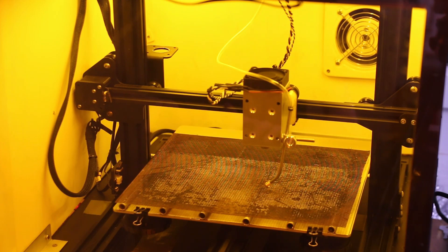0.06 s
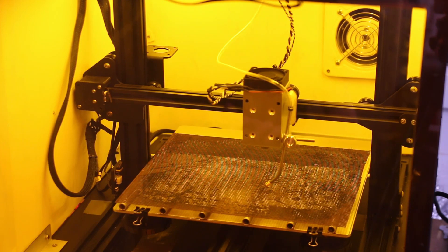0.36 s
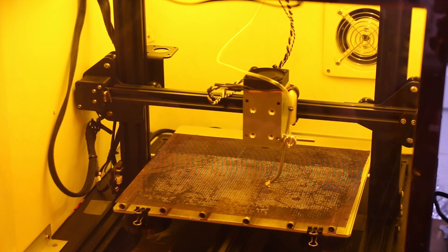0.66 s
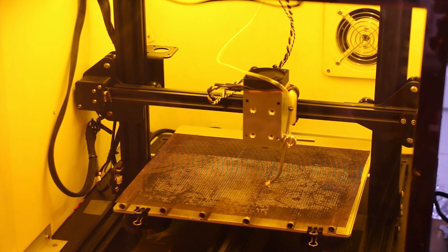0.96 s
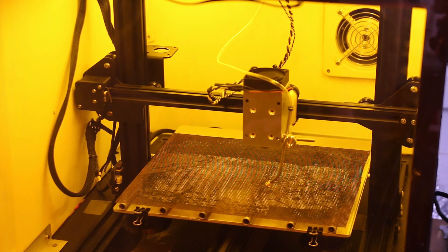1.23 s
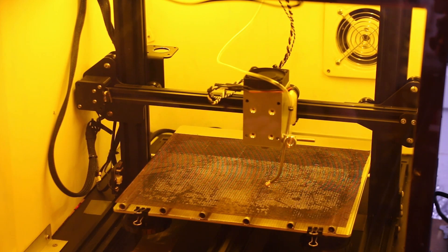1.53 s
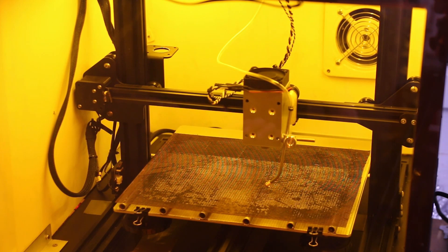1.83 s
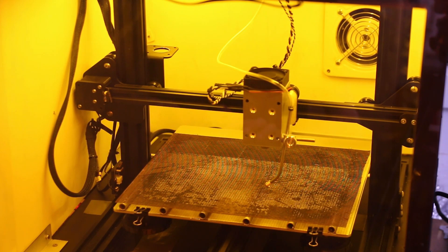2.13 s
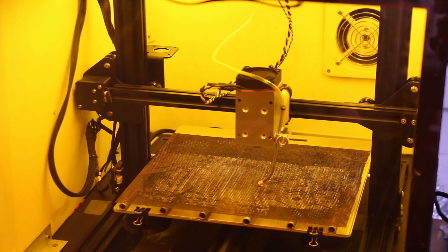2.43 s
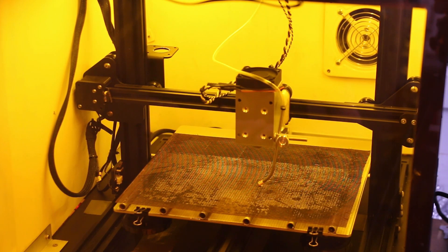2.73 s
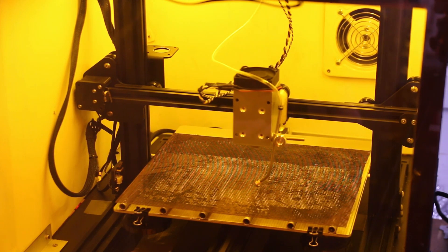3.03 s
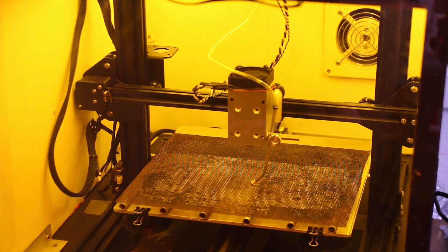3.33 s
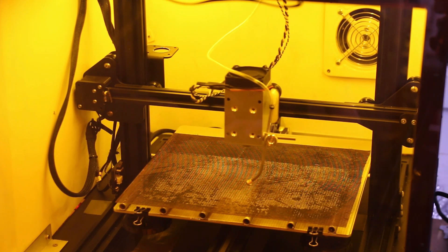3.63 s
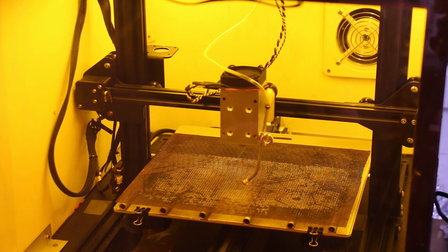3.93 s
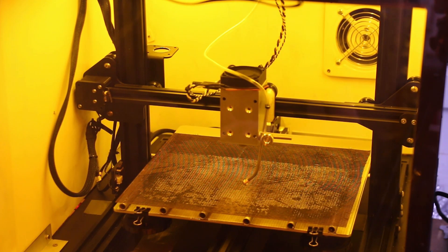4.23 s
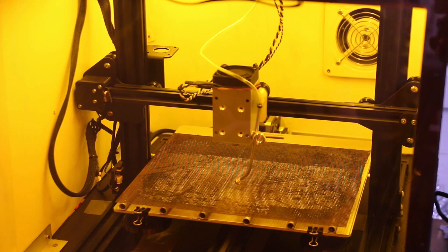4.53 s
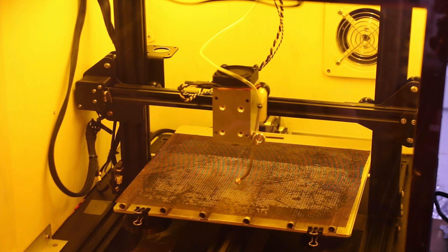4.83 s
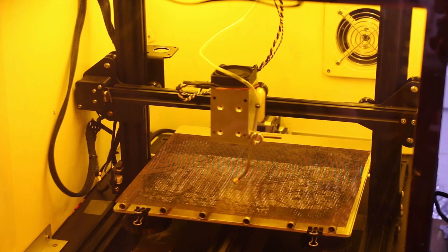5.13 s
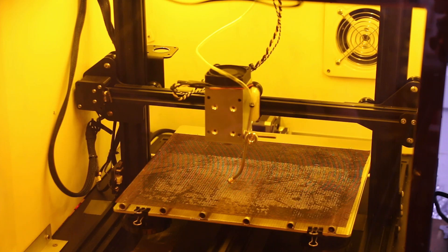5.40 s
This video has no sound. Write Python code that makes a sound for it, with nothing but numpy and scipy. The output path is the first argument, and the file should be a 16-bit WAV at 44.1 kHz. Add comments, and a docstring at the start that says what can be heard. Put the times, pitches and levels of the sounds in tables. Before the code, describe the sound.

A bright, steady hiss of compressed air from a small nozzle runs for the whole clip, about five and a half seconds. It strikes a machine bed inside a metal cabinet, so it has a slight ringing colour and short reflections. The hiss is fullest at first. At about 2.3 seconds it turns thinner and a little quieter, and it thins again around 3.1 seconds over a perforated surface. It then creeps up in level and becomes fuller at about 5.3 seconds. Underneath, quieter and constant, a small air pump chatters rapidly, a low electrical hum throbs, and fans rush faintly with a slight whine. Stepper motors add very soft, short, low blips at about 2.4, 3.2, 3.8, 4.6 and 5.3 seconds, barely rising out of the background. The listening position stays fixed.

```python
"""A jet of compressed air hisses from a small nozzle onto the bed of a gantry machine in a metal cabinet.
Its turbulence is broadband noise, coloured by resonances of the gap under the nozzle and by wall echoes.
The hiss is fuller on solid plate and thins as the head creeps across the perforated bed.
Behind it a small air pump chatters and stepper motors blip softly. Fans rush faintly,
and their mains hum beats with the hum of the pump."""
import sys
import numpy as np
from scipy import signal
from scipy.fft import rfft, irfft
from scipy.io import wavfile
from scipy.ndimage import uniform_filter1d

SR = 44100
rng = np.random.default_rng(int(sys.argv[2]) if len(sys.argv) > 2 else 0)


def wav_out(sig):
    """Save sig, one row per channel (or a flat mono array), as 16-bit PCM at SR to the path in sys.argv[1]."""
    wavfile.write(sys.argv[1], SR, np.round(np.clip(np.atleast_2d(sig).T, -1, 1) * 32767).astype(np.int16))


N = 249606
T = np.arange(N) / SR

# Spectra of the jet on the plate, its rim, the holes and their edge: f/Hz, relative density/dB
PLATE_SPECTRUM = [(1700, -13.5), (2400, -11.5), (3000, -8.5), (4200, -7), (4800, -4), (5350, -0.5),
                  (6300, -3), (7000, -1.5), (8600, -4), (9800, -6), (11100, -9), (12400, -5.5), (15700, -8)]
RIM_SPECTRUM = [(1700, -13), (2700, -9), (4300, -5), (5300, -1.5), (7000, -0.5), (8700, -1.5),
                (10000, -4.5), (11000, -6.5), (12400, -3.5), (15700, -4.5)]
HOLES_SPECTRUM = [(1700, -11.5), (2700, -10), (4400, -5), (5500, -1.5), (7000, -2), (9000, -2), (10000, -4),
                  (11000, -7.5), (12000, -2.5), (14600, -5), (15700, -3.5)]
EDGE_SPECTRUM = [(1700, -17), (3000, -8.5), (4300, -5.5), (5300, -4.5), (7000, -2.5), (9000, -6),
                 (11000, -8.5), (12400, -6.5), (15700, -8.5)]
# Modes of the gap under the nozzle on the same surfaces: f/Hz, bandwidth/Hz, relative gain/dB
PLATE_MODES = [(3036, 77, -9), (3330, 69, -4.5), (3535, 31, -14), (3680, 18, -1), (3837, 50, -2.5),
               (4014, 21, 0), (4250, 31, -5), (4500, 14, 2), (4640, 23, 0.5), (5070, 20, 3),
               (5250, 170, -0.5), (5740, 86, -1.5), (6060, 47, 1.5), (6450, 34, -2.5), (6920, 62, 1),
               (7730, 64, -7), (7780, 53, -9), (8200, 31, -2.5), (8600, 60, -1), (8840, 66, -5.5)]
RIM_MODES = [(5260, 78, -3), (6550, 32, -2), (6860, 82, -1), (8500, 53, -8), (8840, 110, -2.5),
             (10300, 100, -5.5), (10800, 48, -8), (12600, 74, -10), (13100, 120, -8), (14300, 110, -12)]
HOLES_MODES = [(5800, 46, 1), (6350, 52, -1), (6830, 150, -1), (7300, 47, 2), (8320, 41, 1),
               (11300, 42, -7), (12300, 64, -5), (13000, 160, -6), (14300, 68, -1), (14800, 200, -5)]
EDGE_MODES = [(3480, 30, 0), (4880, 27, 3), (5200, 38, 5), (5540, 34, 2), (5800, 78, 0), (6100, 29, -2),
              (6740, 210, -4.5), (7170, 92, -6), (8710, 29, 1), (9080, 56, -0.5)]
# Passages of the jet from plate to rim, rim to holes and holes to edge: midpoint t/s, duration/s
SURFACE_CROSSINGS = [(2.32, 0.068), (3.14, 0.13), (5.27, .06)]
# Valve impacts in one turn of the pump: t/s after the stroke, relative level/dB
VALVE_SLAPS = [(0, 0), (.006, -5), (.0225, -8)]
# Modes of the pump housing: f/Hz, bandwidth/Hz, relative gain/dB
HOUSING_MODES = [(689.4, 33, -10.5), (957.7, 18, -3.5), (975.4, 24.7, 1.5), (1073, 27, -4),
                 (1170, 6.7, -12.5), (1194, 58, -9.5), (1322, 66, -3.5), (1350, 63, -1.5), (1513, 53, 0),
                 (1615, 33, -3.5), (1641, 38, -5.5)]
# Spectrum of the flow through the pump outlet: f/Hz, relative density/dB
OUTLET_SPECTRUM = [(880, -23), (980, 2), (1100, -24), (1200, -5), (1270, -10.5), (1350, 6), (1450, -11.5),
                   (1520, 3), (1620, -6.5), (1740, -17.5)]
# Stepper blips heard through the frame: centre t/s, f/Hz, greatest rms level/dB, 1/e half-length/s
STEPPER_BLIPS = [(2.35, 470, -59, 0.067), (3.17, 453, -60, .035), (3.26, 175, -60.5, 0.038),
                 (3.76, 460, -64, 0.032), (4.55, 460, -65, .06), (5.25, 481, -63, 0.045)]
# Hum lines of the fan motors and the pump: f/Hz, relative level/dB
HUM_LINES = [(45.82, -81), (68.74, -70), (77.04, -75.5), (85.71, -59.3), (99.95, -51.5), (114.56, -59.7),
             (122.86, -62.2)]
# Faint wavering whine, mostly overtones of the air pump: f/Hz, relative level/dB
WHINE_LINES = [(160.4, -73.5), (177.4, -75.5), (200, -73.5), (229, -80), (252, -74), (275, -71.5),
               (321, -72), (343.7, -72.5), (502, -75.5), (596.5, -75.5), (641.5, -75), (664.4, -64.5),
               (780, -75), (823, -75)]
# Spectrum of the air rush of the fans: f/Hz, relative density/dB
FAN_SPECTRUM = [(20, -12), (55, -17), (90, 6), (135, -7), (170, 1.5), (220, -1.5), (400, -1), (700, 3),
                (860, -1), (1400, 4.5), (1900, -6), (3000, -6.5)]
# Tones of a fan grille: f/Hz, relative level/dB
GRILLE_TONES = [(1146, -65), (1171, -63.5), (1200, -60.5), (1212, -62)]

PLATE_DB, RIM_DB, HOLES_DB, EDGE_DB = -39.5, -43.5, -45.5, -41.5   # base levels of the hiss
HEAD_START_S, HEAD_M_PER_S, SOUND_M_PER_S = 2.45, .0086, 343
PUMP_HZ, FIRST_STROKE_S = 22.912, .0078


def nozzle(flutter_db, rise_db_per_s):
    """Jet impingement: the level and colour of the hiss depend on the surface that the air strikes."""
    plate, rim, holes, edge = np.sqrt(surface_shares())   # amplitude is the root of power
    nearing_edge_db = rise_db_per_s * (T - SURFACE_CROSSINGS[1][0])
    on_plate = plate * from_db(PLATE_DB) * jet(PLATE_SPECTRUM, PLATE_MODES, ring_db=-5.0)
    on_rim = rim * from_db(RIM_DB) * jet(RIM_SPECTRUM, RIM_MODES, ring_db=-8.5)
    holes_gain = holes * from_db(HOLES_DB + nearing_edge_db)
    over_holes = holes_gain * jet(HOLES_SPECTRUM, HOLES_MODES, ring_db=-8.0)
    on_edge = edge * from_db(EDGE_DB) * jet(EDGE_SPECTRUM, EDGE_MODES, ring_db=-6)
    return (on_plate + on_rim + over_holes + on_edge) * from_db(flutter_db * drift(24.8))


def jet(spectrum, modes, ring_db):
    """Turbulence radiates broadband noise, while the gap under the nozzle rings by cavity resonance."""
    rush = cabinet(coloured_noise(spectrum), echo_db=-1.5, spread_s=.036, count=40)
    ringing = resonate(rng.standard_normal(N), modes)
    return rms_one(rush + from_db(ring_db) * ringing)


def surface_shares():
    """Partition of power: each crossing hands the jet to the next surface, and the shares sum to one."""
    passed = [np.clip(.5 + (T - mid_s) / takes_s, 0, 1) for mid_s, takes_s in SURFACE_CROSSINGS]
    return np.maximum(-np.diff([np.ones(N), *passed, np.zeros(N)], axis=0), 0)


def cabinet(x, echo_db, spread_s, count):
    """Comb filtering: wall echoes interfere, each path growing or shrinking as the head travels."""
    travel_m = HEAD_M_PER_S * np.maximum(T - HEAD_START_S, 0)
    fine = signal.resample_poly(x, 4, 1)   # delays resolved to a quarter of a sample
    echoes = np.zeros(N)
    for late, slant, sign in rng.uniform(-1, 1, (count, 3)):
        delay_s = .002 + spread_s * abs(late) + slant * travel_m / SOUND_M_PER_S
        read = np.round((T - delay_s) * SR * 4).astype(int) % len(fine)
        echoes += np.sign(sign) * np.exp(-abs(late)) * fine[read]
    return rms_one(x + from_db(echo_db) * rms_one(echoes))


def pump_valves(level_db, leak_db, uneven_db, jitter_s):
    """Impact excitation: valve slaps in every turn, with a steady leak, ring the modes of the housing."""
    strokes_s = FIRST_STROKE_S + np.arange(int(N / SR * PUMP_HZ) + 1) / PUMP_HZ
    slaps = np.zeros(N)
    for after_s, db in VALVE_SLAPS:
        late, strength = rng.standard_normal((len(strokes_s), 2)).T
        at = np.round((strokes_s + after_s + jitter_s * late) * SR).astype(int)
        heard = (at >= 0) & (at < N)
        slaps[at[heard]] += from_db(db + uneven_db * strength[heard])
    leak = from_db(leak_db) * rng.standard_normal(N)
    housing = resonate(rms_one(slaps) + leak, HOUSING_MODES)
    muffle = signal.butter(4, [550, 1750], "band", fs=SR, output="sos")
    return from_db(level_db) * rms_one(signal.sosfilt(muffle, housing))


def pump_outlet(level_db, peak_s, half_length_s):
    """Pulsating flow: every stroke drives about the same amount of air through the outlet as a puff."""
    flow = coloured_noise(OUTLET_SPECTRUM)
    power = uniform_filter1d(flow ** 2, int(.013 * SR))   # mean over 13 ms
    even_flow = flow / np.sqrt(power + 1e-12)
    since_stroke_s = (T - FIRST_STROKE_S) % (1 / PUMP_HZ)
    envelope = np.exp(-((since_stroke_s - peak_s) / half_length_s) ** 2)
    return from_db(level_db) * rms_one(even_flow * envelope)


def steppers(jitter_s, sag_per_s):
    """Forced vibration: a slowing motor's tone sweeps past a frame resonance, rough from uneven steps."""
    blips = np.zeros(N)
    uneven_s = jitter_s * drift(90)
    for centre_s, hz, db, half_s in STEPPER_BLIPS:
        t = T - centre_s
        cycles = hz * (t - sag_per_s * t ** 2 / 2 + uneven_s)
        blips += from_db(db) * np.exp(-(t / half_s) ** 2) * np.sin(2 * np.pi * cycles)
    return np.sqrt(2) * blips


def motors(hum_db, whine_db, in_phase_s):
    """Beating: close hum lines swell together about 14 times a second, under faint wavering tones."""
    hum = sum(from_db(db) * np.cos(2 * np.pi * hz * (T - in_phase_s)) for hz, db in HUM_LINES)
    whine = sum(from_db(db) * np.cos(2 * np.pi * (hz * T + rng.random()) + .25 * drift(4))
                for hz, db in WHINE_LINES)
    return np.sqrt(2) * (from_db(hum_db) * hum + from_db(whine_db) * whine)


def fans(level_db, gust_db, grille_db, waver_rad):
    """Flow noise: a soft, slightly uneven rush of air sings faintly in the grille."""
    rush = coloured_noise(FAN_SPECTRUM) * from_db(level_db + gust_db * drift(4.8))
    song = sum(from_db(db) * np.sin(2 * np.pi * hz * T + waver_rad * drift(9))
               for hz, db in GRILLE_TONES)
    return rush + from_db(grille_db) * np.sqrt(2) * song


def resonate(x, modes):
    """Modal superposition: damped resonators in parallel add with alternating signs; rms 1."""
    response = np.zeros(N)
    for k, (hz, width_hz, db) in enumerate(modes):
        radius = np.exp(-np.pi * width_hz / SR)
        poles = [1, -2 * radius * np.cos(2 * np.pi * hz / SR), radius ** 2]
        gain = (-1) ** k * from_db(db) * (1 - radius ** 2) / 2
        response += gain * signal.lfilter([1, 0, -1], poles, x)
    return rms_one(response)


def coloured_noise(spectrum):
    """Spectral shaping: white noise takes the given spectrum and falls 20 dB/octave outside it; rms 1."""
    hz, db = np.transpose(spectrum)
    octave = np.log2(np.maximum(np.arange(N // 2 + 1) * SR / N, 1))
    octaves_outside = np.abs(octave - np.clip(octave, np.log2(hz[0]), np.log2(hz[-1])))
    gain = from_db(np.interp(octave, np.log2(hz), db) - 20 * octaves_outside)
    return rms_one(irfft(rfft(rng.standard_normal(N)) * gain, N))


def drift(rate_hz):
    """Random fluctuation: straight lines join Gaussian values drawn at the given rate; rms 1."""
    knots = rng.standard_normal(size=1000)
    return rms_one(np.interp(T * rate_hz, np.arange(len(knots)), knots))


def from_db(db):
    """Amplitude ratio of a level in decibels."""
    return 10 ** (np.asarray(db) / 20)


def rms_one(x):
    """Normalisation to rms 1."""
    return x / np.sqrt(np.mean(x ** 2) + 1e-20)


def scene():
    """Superposition: the pressures of all sources add at one point, the same in both channels."""
    hiss = nozzle(flutter_db=0.4, rise_db_per_s=0.85)
    chatter = pump_valves(level_db=-53.0, leak_db=-6.5, uneven_db=-0.2, jitter_s=.00008)
    puffs = pump_outlet(level_db=-54.5, peak_s=0.011, half_length_s=0.014)
    hum = motors(hum_db=0.07, whine_db=-2.0, in_phase_s=.82)
    rush = fans(level_db=-55.5, gust_db=0.43, grille_db=-1.4, waver_rad=1.34)
    blips = steppers(jitter_s=0.00065, sag_per_s=0.41)
    return np.tile(hiss + chatter + puffs + blips + hum + rush, (2, 1))


def record(dry):
    """Band limiting: a steep elliptic low-pass removes the treble above 15.7 kHz."""
    return signal.sosfilt(signal.ellip(12, .1, 80, 15700, fs=SR, output="sos"), dry)


dry = scene()
out = record(dry)
wav_out(out)
```